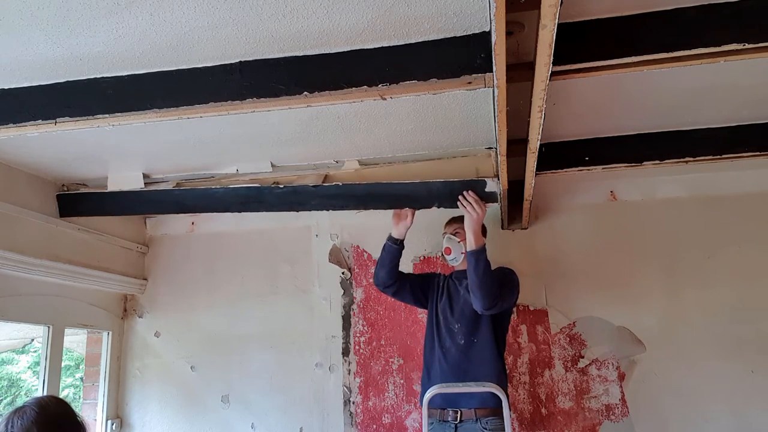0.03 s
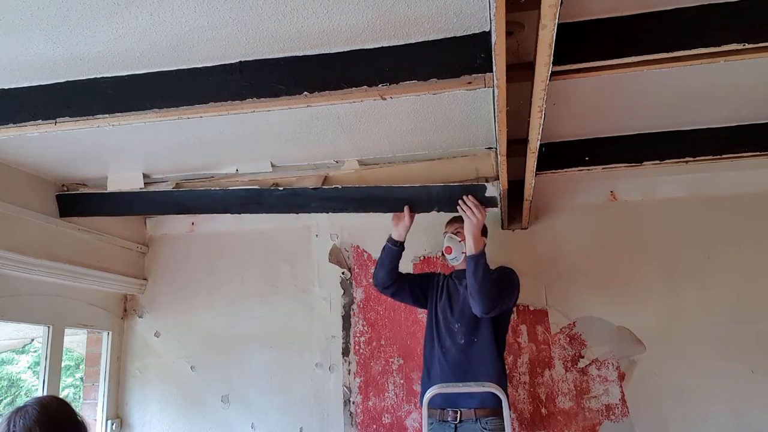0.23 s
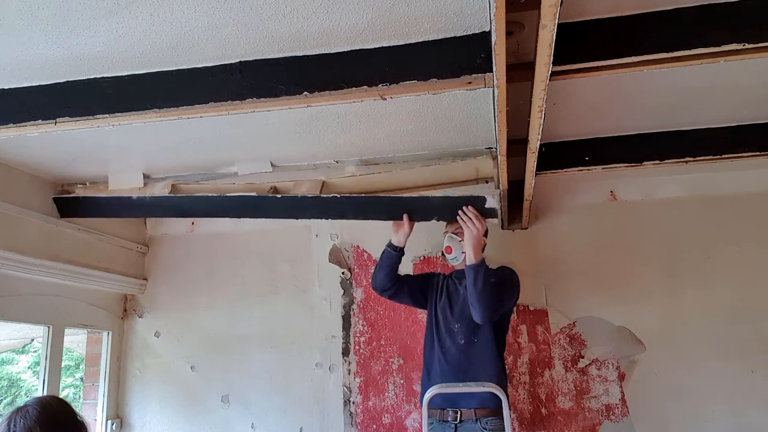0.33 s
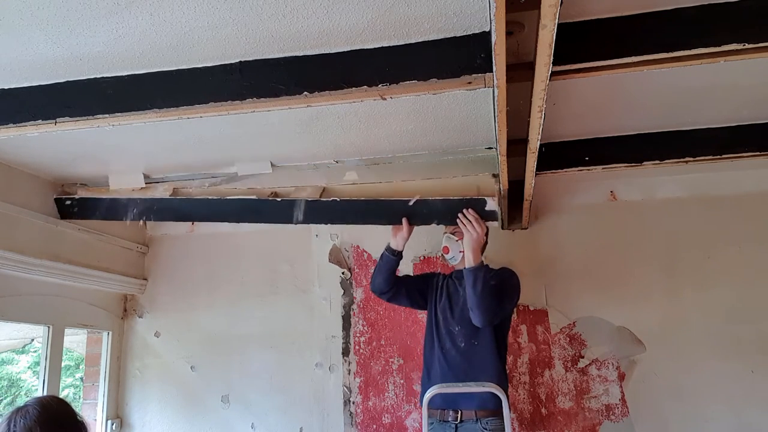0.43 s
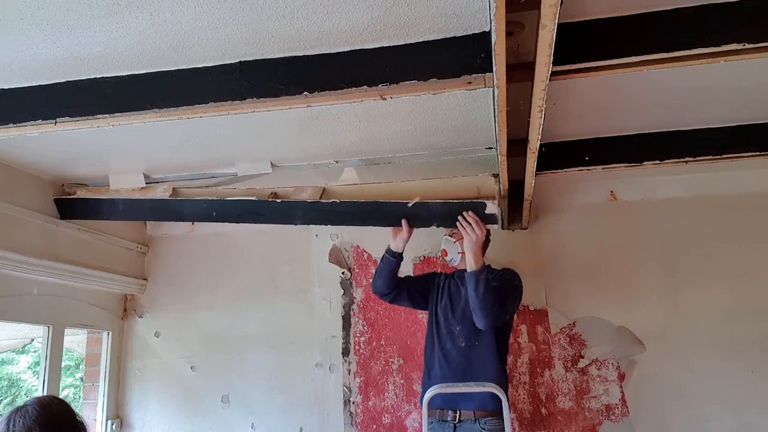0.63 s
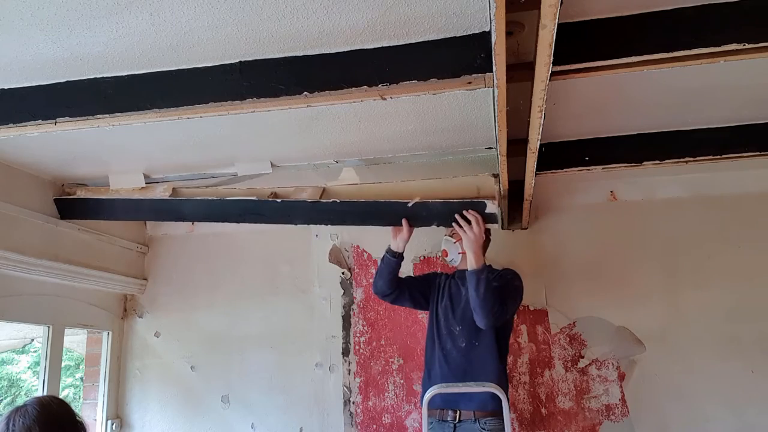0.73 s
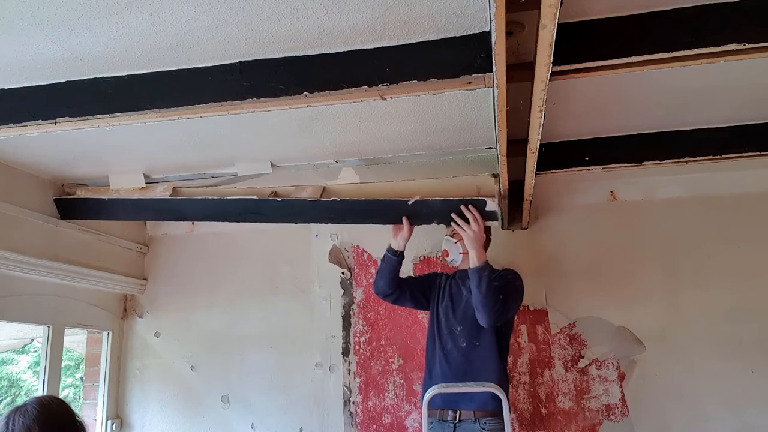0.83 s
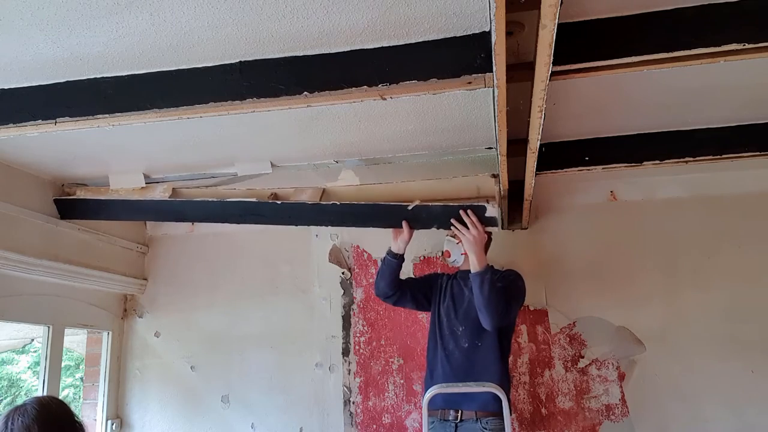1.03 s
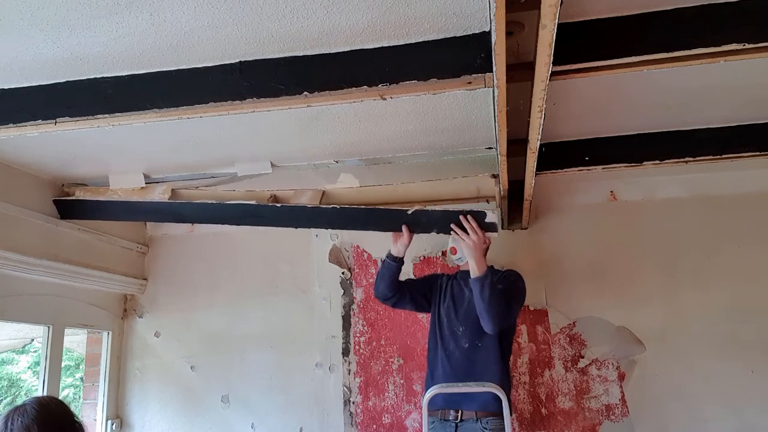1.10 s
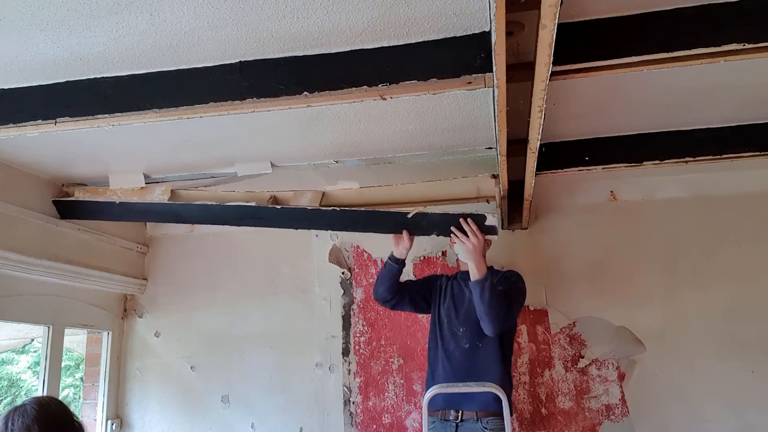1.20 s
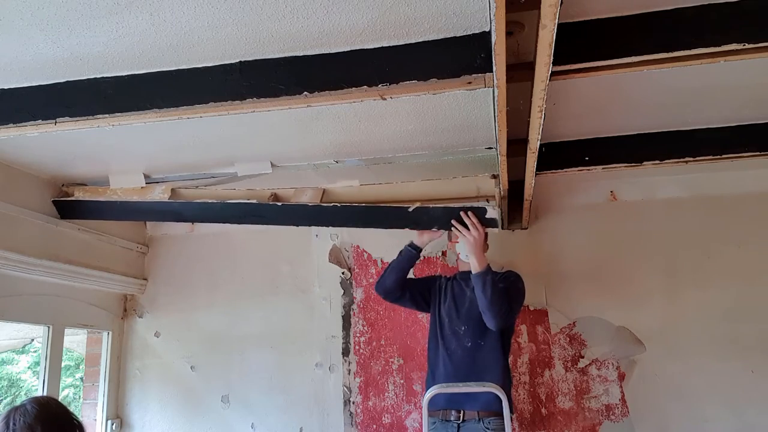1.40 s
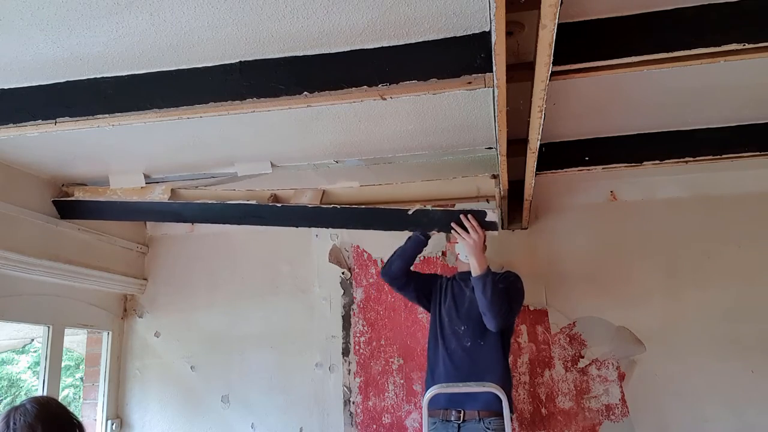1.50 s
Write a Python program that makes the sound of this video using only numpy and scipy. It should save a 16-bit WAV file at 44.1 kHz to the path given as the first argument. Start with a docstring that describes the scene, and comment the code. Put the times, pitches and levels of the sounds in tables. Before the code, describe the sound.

Loud thud and splintering crack of a ceiling beam pulled free, then crumbs and scraping.

```python
"""A hollow false beam thuds and booms as it is pulled off a ceiling in a bare room.
Its fixing splinters in clusters of tiny fractures and lets go; the blows set the wooden box
ringing, then it tears and knocks a second time. Plaster crumbs tick down, and the loose beam
creaks, judders and scrapes along the plaster in small slips as it is lowered."""
import sys
import numpy as np
from scipy import signal
from scipy.fft import rfft, irfft
from scipy.io import wavfile

SR = 44100
rng = np.random.default_rng(int(sys.argv[2]) if len(sys.argv) > 2 else 0)


def store_wav(level_fs):
    """Save 16-bit WAV to argv[1]."""
    pcm = np.round(np.clip(np.atleast_2d(level_fs), -1, 1) * 32767)
    wavfile.write(sys.argv[1], SR, pcm.T.astype(np.int16))


N = 68355
PLACES = 6  # spots along the beam, each with its own reflections


# Hits of the beam on the ceiling (time [s], energy [dB], decay [s], tilt [dB/octave])
BEAM_HITS = [(0.22, 0.5, 0.0013, -1.5), (0.231, 15.5, 0.0034, 4.5), (0.241, 17.5, 0.0031, 2.5),
             (0.255, 18.5, 0.0066, -1), (0.279, 8.5, 0.0039, -0.5), (0.312, 9.5, 0.0058, -4),
             (0.362, 8.5, 0.012, -4.5), (0.3736, 16, 0.0049, 0), (0.403, 8, 0.01, -2),
             (0.482, -3, 0.022, -3)]
# Boxy tone of a hit (frequency [Hz], level [dB])
THUD_EQ = [(20, -51), (30, -44), (42, -14), (60, -13), (80, -4), (120, -9), (150, -4), (200, -1.5),
           (380, 2), (530, -1), (630, -11), (770, -2), (1000, -9.5), (1380, -10.5), (1600, -19.5),
           (3000, -30), (6000, -55.5), (16000, -68)]
def thuds():
    """Each blow is a short rattle of contacts on the hollow wooden box."""
    out = np.zeros((PLACES, N))
    for s, db, decay_s, tilt_db in BEAM_HITS:
        rattle = burst(rise_s=0.0017, decay_s=decay_s)
        add(out, s, amp(db) * unit(coloured(rattle, THUD_EQ, tilt_db)))
    return out


RING_DB, RING_RISE_S = -36, 0.015
# Modes of the hollow beam and ceiling (frequency [Hz], relative level [dB], t60 [s])
BOOM_MODES = [(47.6, -12, .85), (84.5, -5, .72), (106.6, -10.5, 0.56), (188.7, 2, 0.66), (249, -1, .55),
              (286, 1.5, 0.5), (314, -5, 0.28), (349.3, 6.5, 0.19), (379.4, -3.5, 0.53), (415.4, -7, .65),
              (521, -1.5, 0.49), (743, -2.5, .65), (808, 1.5, 0.27), (895, -10, 0.37), (1491, -11, 0.76)]
def boom():
    """The blows feed energy into the beam's modes; dull blows favour the low ones."""
    out, t = np.zeros((2, N)), np.arange(N) / SR
    for hz, mode_db, t60 in BOOM_MODES:
        envelope = amp(-60 * t / t60) * (1 - np.exp(-t / RING_RISE_S))
        energy = np.zeros(N)
        for s, db, _, tilt_db in BEAM_HITS:
            drive = amp(db + tilt_db * np.log2(max(hz, 150) / 400))
            add(energy, s, (drive * envelope) ** 2)
        # A phase gap between left and right gives the ring its width.
        gap = np.arccos(np.clip(read(STEREO_LIKENESS, hz), -1, 1)) * rng.choice([-.5, .5])
        phase = 2 * np.pi * (hz * t + rng.random()) + np.array([[gap], [-gap]])
        out += amp(RING_DB + mode_db) * np.sqrt(energy) * np.sin(phase)
    return out / 2


# Splintering cracks (time [s], energy [dB], rise [s], decay [s], tilt [dB/octave])
SPLINTERS = [(0.205, 0, 0.0043, 0.0049, 0), (0.218, 1.5, 0.0037, 0.0044, 6.5),
             (0.2255, 12, 0.0012, 0.003, 0), (0.2315, 11.5, .001, 0.016, 2.5),
             (0.292, 7.5, 0.0047, 0.0053, -3), (0.345, -0.5, 0.012, .02, 1), (0.368, 5.5, .02, 0.024, -1),
             (0.398, 7, 0.0053, 0.038, -3)]
# Bright bite of a crack (frequency [Hz], level [dB])
SPLINTER_EQ = [(50, -15), (400, -10.5), (1000, -1), (1700, -1.5), (2400, -1), (3300, 1), (4200, 0.5),
               (5000, -2), (6000, -11.5), (9500, -13.5), (12200, -11.5), (13500, -15), (16000, -23.5)]
def splinters():
    """Wood and plaster fracture as the fixing lets go."""
    return snaps(SPLINTERS, SPLINTER_EQ)


SLIPS_PER_S, SLIP_SPREAD_DB, CREAK_Q = 690, -2, 3.8
# Creaks and groans (time [s], energy [dB], length [s], resonance [Hz])
CREAK_CUES = [(0, -26.5, 0.036, 1130), (0, -32.5, 0.011, 143), (0.09, -21.5, 0.094, 1020),
              (0.119, -18.5, .08, 112), (1.158, -17, 0.017, 350), (1.235, -16.5, 0.1, 330),
              (1.277, -14, 0.037, 1110), (1.36, -15, 0.047, 1610), (1.357, -14, 0.03, 3140)]
def creaks():
    """The wood sticks and slips: a swell of clicks through one resonance."""
    out = np.zeros((PLACES, N))
    for s, db, length_s, hz in CREAK_CUES:
        slips = grains(SLIPS_PER_S, SLIP_SPREAD_DB, size=8192)
        t = np.arange(slips.shape[1]) / SR
        swell = np.sin(np.pi * np.minimum(t / length_s, 1))
        creak = signal.lfilter(*signal.iirpeak(hz, CREAK_Q, SR), slips * swell)
        add(out, s, amp(db) * unit(creak))
    return out


# Fader ride of the judder (time [s], level [dB])
JUDDER_RIDE = [(0, -56), (.04, -72), (.09, -59.5), (.15, -58.5), (.21, -58), (.4, -73.5), (.98, -78.5),
               (1.04, -54.5), (1.10, -49), (1.19, -53), (1.25, -46.5), (1.31, -52.5), (1.37, -55),
               (1.44, -66), (1.55, -76.5)]
# Woody body of the judder (frequency [Hz], level [dB])
JUDDER_EQ = [(20, -43), (50, -8), (130, -7.5), (220, -0.5), (280, -1), (345, 2), (420, -5.5), (520, 0),
             (730, 0.5), (860, 0.5), (1040, -3.5), (1250, -4), (1500, -11.5), (3000, -16.5), (16000, -61)]
def judder():
    """Small slips shake the beam's body as it is strained and slid."""
    return friction(JUDDER_RIDE, JUDDER_EQ, SLIPS_PER_S, SLIP_SPREAD_DB)


# Fader ride of the scrape (time [s], level [dB])
SCRAPE_RIDE = [(0, -46), (.03, -81), (.07, -56), (.10, -55), (.19, -52.5), (.3, -54), (.85, -84.5),
               (1.0, -60.5), (1.10, -54), (1.135, -39), (1.22, -41), (1.29, -42.5), (1.385, -38.5),
               (1.43, -47), (1.48, -48), (1.55, -49)]
# Gritty edge of the scrape (frequency [Hz], level [dB])
SCRAPE_EQ = [(50, -23), (400, -17.5), (900, -19.5), (1800, -3.5), (2600, -3.5), (3000, 1), (3600, 0),
             (4300, -1.5), (5200, -2.5), (5900, -8), (8000, -12), (11500, -7.5), (16000, -12.5)]
def scrape():
    """The beam slides on plaster in a dense stream of grit clicks."""
    return friction(SCRAPE_RIDE, SCRAPE_EQ, per_s=2500, spread_db=3.5)


# Plaster ticks (time [s], energy [dB], rise [s], decay [s], tilt [dB/octave])
CRUMB_TICKS = [(0.53, -17.5, 0.0011, .002, 0), (0.668, -17, 0.00071, 0.0026, 1.5),
               (0.752, -13.5, 0.002, 0.0087, 3.5), (0.768, -13.5, 0.0034, 0.0092, 1.5),
               (0.793, -18, 0.002, 0.009, 0), (0.9476, -19.5, .0004, 0.00086, 11.5),
               (1.024, -23, 0.0024, 0.0017, 4.5), (1.043, -16, 0.0034, 0.0088, -3.5),
               (1.114, -11.5, 0.0033, .012, 2), (1.168, -9.5, 0.0014, 0.0049, 2.5),
               (1.1958, -5.5, 0.00025, 0.00034, -3.5), (1.21, -13, .006, 0.025, -5)]
# Thin, crisp tone of a crumb (frequency [Hz], level [dB])
CRUMB_EQ = [(50, -47), (1000, -31), (2400, -9), (3100, -1.5), (4300, 2.5), (5200, 0), (6100, -4.5),
            (8000, -11), (11000, -8.5), (16000, -16)]
def crumbs():
    """Plaster crumbles and ticks down."""
    return snaps(CRUMB_TICKS, CRUMB_EQ)


ROOM_BUILD_S, EARLY_DB, EARLY_S = 0.001, -1.5, 0.012
# Reverb time of the bare room (frequency [Hz], t60 [s])
REVERB_T60 = [(50, 0.91), (150, 0.49), (400, 0.51), (900, .72), (1400, 0.74), (2200, 0.69), (4500, 0.56),
              (8000, 0.51), (15000, 0.27)]
def room(places, direct_db):
    """Each place has its direct sound and its own wall reflections, each band dying at its own speed."""
    t, out = np.arange(SR) / SR, np.zeros((2, N))
    onset = (1 - np.exp(-t / ROOM_BUILD_S)) * (1 + amp(EARLY_DB) * np.exp(-t / EARLY_S))
    for source in places:
        hz, when, bands = signal.stft(diffuse(rng.standard_normal((2, SR))), SR, nperseg=512)
        t60 = read(REVERB_T60, hz)[:, None]
        tail = signal.istft(bands * 1000. ** (-when / t60), SR, nperseg=512)[1][:, :SR]
        response = np.sqrt(2) * unit(tail * onset)
        response[:, 0] += amp(direct_db)
        out += signal.fftconvolve(source[None], response, axes=1)[:, :N]
    return out / np.hypot(1, amp(direct_db))


# Tone of the room's air (frequency [Hz], level [dB])
AIR_EQ = [(20, -21), (45, -5.5), (80, -6), (200, -16), (500, -17), (1000, -8), (2200, -9), (4000, -19.5),
          (6500, -25), (11000, -18), (16000, -29)]
def room_tone(level_db=-62.5):
    """A faint, steady bed of diffuse noise."""
    hz = np.fft.rfftfreq(N, 1 / SR)
    noise = irfft(rfft(rng.standard_normal((2, N))) * amp(read(AIR_EQ, hz)), N)
    return amp(level_db) * np.sqrt(2 * N) * unit(diffuse(noise))


# Stereo image: centred lows, wide highs (frequency [Hz], left-right correlation [-1 to 1])
STEREO_LIKENESS = [(50, 0.96), (170, 0.97), (330, .7), (700, 0.39), (1400, -0.13), (3000, -0.095),
                   (7000, -0.027), (16000, -0.035)]
def diffuse(pair):
    """Makes two unrelated channels as alike as the room's diffuse sound is."""
    a, b = rfft(pair)
    like = np.clip(read(STEREO_LIKENESS, np.fft.rfftfreq(pair.shape[1], 1 / SR)), -1, 1)
    mid, side = a * np.sqrt((1 + like) / 2), b * np.sqrt((1 - like) / 2)
    return irfft([mid + side, mid - side], pair.shape[1])


def snaps(cues, eq):
    """Plays one cluster of tiny fractures per cue."""
    out = np.zeros((PLACES, N))
    for s, db, rise_s, decay_s, tilt_db in cues:
        add(out, s, amp(db) * unit(coloured(burst(rise_s, decay_s), eq, tilt_db)))
    return out


def friction(ride, eq, per_s, spread_db):
    """A stream of small slips under a level curve."""
    slips = np.sqrt(N) * unit(grains(per_s, spread_db, N))
    fader = amp(np.interp(np.arange(N) / SR, *np.transpose(ride)))
    return coloured(slips * fader, eq)[:, :N]


def burst(rise_s, decay_s, size=8192):
    """A cluster of clicks that swells and dies."""
    t = np.arange(size) / SR
    envelope = np.minimum(t / rise_s, 1) * np.exp(-np.maximum(t - rise_s, 0) / decay_s)
    return grains(per_s=2500, spread_db=4.5, size=size) * envelope


def grains(per_s, spread_db, size):
    """Random clicks of either sign and uneven strength at each place along the beam."""
    chance, strength, sign = rng.random((3, PLACES, size))
    gain = amp(spread_db * np.minimum(-np.log(1 - strength), 4))
    return (chance < per_s / PLACES / SR) * np.sign(sign - .5) * gain


def coloured(clicks, eq, tilt_db=0, size=4096):
    """Gives every click the minimum-phase tone of its material, tilted by tilt_db per octave."""
    hz = np.fft.rfftfreq(size, 1 / SR)
    log_gain = np.log(amp(read(eq, hz) + tilt_db * np.log2(np.maximum(hz, 150) / 1000)))
    mirrored = np.concatenate([log_gain, log_gain[-2:0:-1]])
    spectrum = np.exp(np.conj(signal.hilbert(mirrored)))
    tap = unit(np.fft.ifft(spectrum).real[:size // 2])
    return signal.fftconvolve(clicks, tap[None], axes=1)


def amp(db):
    """Decibels to gain."""
    return 10 ** (np.asarray(db) / 20)


def unit(x):
    """Scales to an energy of one."""
    return x / np.sqrt(np.sum(x ** 2) + 1e-20)


def read(points, hz):
    """Reads a table on a log-frequency axis."""
    f, value = np.transpose(points)
    return np.interp(np.log(hz + 1), np.log(f + 1), value)


def add(mix, s, sound):
    """Mixes a sound in at time s."""
    part = mix[..., max(round(s * SR), 0):][..., :sound.shape[-1]]
    part += sound[..., :part.shape[-1]]


def scene():
    """Wood and plaster play into the room, over the boom and the room tone."""
    wood = splinters() + thuds() + creaks() + judder()
    plaster = crumbs() + scrape()
    return room(wood, direct_db=-9) + room(plaster, direct_db=-10) + boom() + room_tone()


CLIP_KNEE, CLIP_LIMIT, LOWPASS_HZ = .7, .95, 15850
# Tonal lean of the microphone pair (frequency [Hz], left minus right [dB])
MIC_BALANCE = [(60, 1.5), (170, 0.5), (350, 1), (1200, 0.5), (2800, 3), (5500, -2.5), (9500, -6),
               (15000, 3.8)]
def record(dry):
    """Two microphones of slightly different colour, a soft clip on the peaks, then a low-pass."""
    lean_db = read(MIC_BALANCE, np.fft.rfftfreq(2 * N, 1 / SR)) / 2
    heard = irfft(rfft(dry, 2 * N) * amp([lean_db, -lean_db]))[:, :N]
    clean, headroom = np.clip(heard, -CLIP_KNEE, CLIP_KNEE), CLIP_LIMIT - CLIP_KNEE
    rounded = clean + headroom * np.tanh((heard - clean) / headroom)
    lowpass = signal.firwin(511, LOWPASS_HZ, window=("kaiser", 9), fs=SR)
    return signal.oaconvolve(rounded, lowpass[None], "same")


dry = scene()
out = record(dry)
store_wav(out)
```